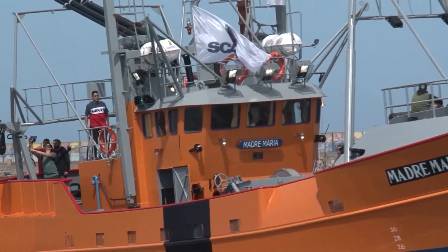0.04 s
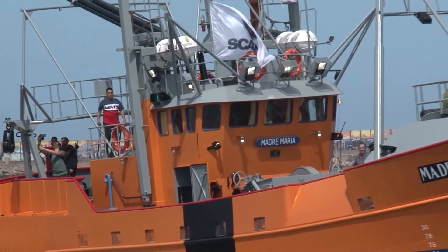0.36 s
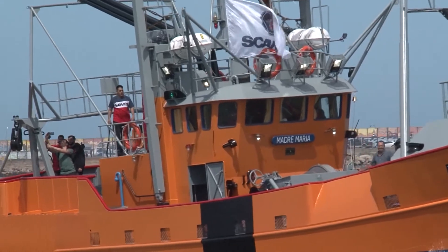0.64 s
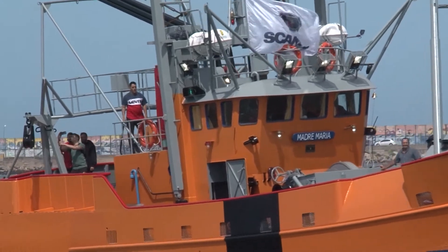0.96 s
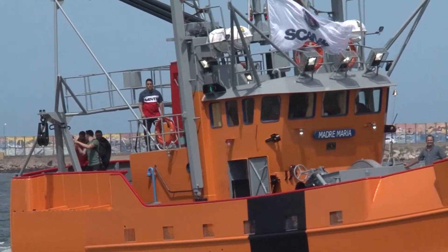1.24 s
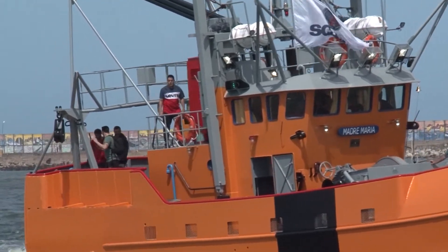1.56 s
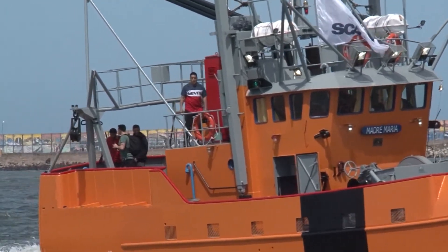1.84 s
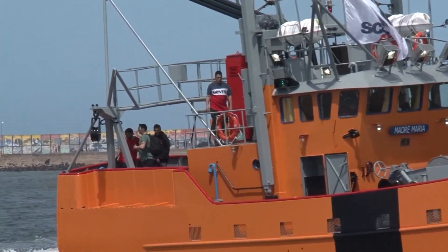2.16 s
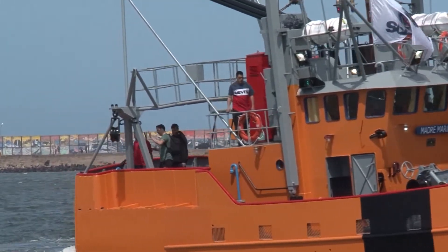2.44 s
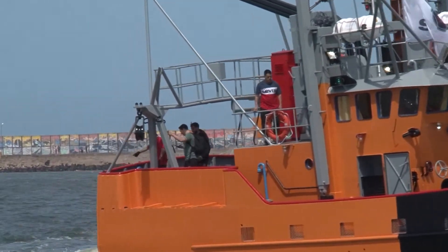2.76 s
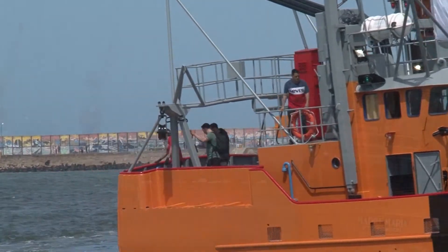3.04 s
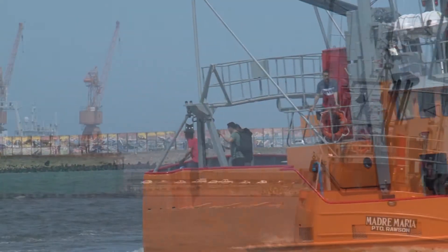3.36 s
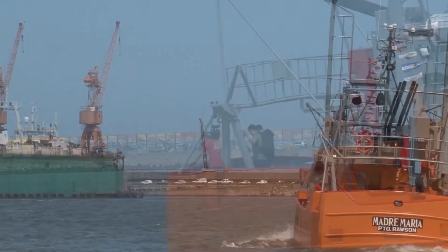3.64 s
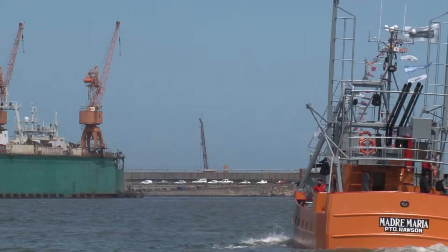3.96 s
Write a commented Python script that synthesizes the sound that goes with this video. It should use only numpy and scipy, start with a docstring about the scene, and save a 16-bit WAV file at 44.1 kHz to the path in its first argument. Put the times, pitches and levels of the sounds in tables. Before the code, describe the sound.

A fishing boat's air horn holds one long, brassy note, then stops and echoes around the harbour. Wind rumbles and thumps on the microphone throughout, and a faint wash of wake comes in near the end.

```python
"""In a windy harbour, a fishing boat passes and holds one long blast on its air horn.
The horn is a stack of harmonics (whole multiples of one pitch); each flutters, higher ones faster.
It stops, and its echoes linger off the quays while wind rumbles and thumps on the microphone.
Near the end, the distant hiss of water gives way abruptly to the wash of the boat's wake,
with a faint engine whine."""
import sys
import numpy as np
from scipy import signal
from scipy.fft import rfft, irfft, next_fast_len
from scipy.io import wavfile
from scipy.ndimage import uniform_filter1d

SR = 44100
rng = np.random.default_rng(int(sys.argv[2]) if len(sys.argv) > 2 else 0)


def unload_wav(signal):
    """Save mono or channel-first audio to the path in sys.argv[1] as 16-bit WAV at rate SR, clipped to [-1, 1]."""
    wavfile.write(
        sys.argv[1],
        SR,
        np.round(np.clip(np.atleast_2d(signal).T, -1, 1) * 32767).astype(np.int16),
    )


N = 176400  # 4 seconds

# the horn's pitch, sinking as the boat passes: (time [s], pitch [Hz])
HORN_PITCH = [(0, 273.6), (.7, 273.75), (1.5, 273.45), (2.1, 273.25), (2.6, 273.05)]
# how loud the horn is, before each harmonic is shaped: (time [s], level [dB])
HORN_LEVEL = [(0, -31), (.2, -26.5), (.4, -28), (.9, -26), (1.3, -25), (1.5, -23.5), (1.75, -24.5),
              (1.88, -25.5), (2.05, -26), (2.35, -26.5), (2.6, -26)]
# how the flare, the horn's wide mouth, shapes the harmonics: (frequency [Hz], gain [dB])
FLARE_COLOUR = [(273, 0.5), (547, -4), (820, -17.5), (1093, -13.5), (1366, -14.5), (1640, -19.5),
                (1913, -18.5), (2186, -29), (2460, -33), (2733, -31), (3006, -32.5), (3280, -37),
                (3826, -43.5), (4373, -40), (4920, -47.5), (6800, -57.5), (9000, -70), (11500, -84)]
# how fast the flare rings down after the blast: (frequency [Hz], fade [dB/s])
FLARE_FADE = [(273, 210.5), (547, 125.5), (820, 419), (1100, 441), (1400, 271), (4000, 233)]
# how deeply each harmonic flutters: (frequency [Hz], relative level [dB])
FLUTTER_DEPTH = [(273, -27), (547, -23), (820, -5), (1093, -12), (1366, -14), (1640, -11), (1913, -10.5),
                 (2400, -7), (4400, -7), (8000, -5)]
# boost or dip of the middle harmonics: (time [s], gain [dB])
MIDDLE_BOOST = [(0, 7), (.15, 5.5), (.35, 10), (.55, 7), (.72, -3), (0.932, 2.5), (1.25, -2), (1.55, -3.5),
                (1.8, 2), (1.92, 6), (2.119, 6), (2.331, 4), (2.5, 14.5), (2.6, 7)]
# the centre of that middle band, sinking as the boat passes: (time [s], frequency [Hz])
MIDDLE_CENTRE = [(0, 1035), (1.9, 1042), (2.4, 943)]
# boost or dip of the fifth harmonic: (time [s], gain [dB])
FIFTH_BOOST = [(0, 3), (.12, -11.5), (.3, 6), (.45, 3), (.55, -7.5), (.8, -8.5), (0.949, 1), (1.15, -3),
               (1.33, -2.5), (1.449, 1), (1.8, 5), (2.349, 2.5), (2.6, 4)]
# boost or dip of the harmonics around UPPER_HZ: (time [s], gain [dB])
UPPER_BOOST = [(0, -1), (0.651, -2.5), (0.999, 2), (1.199, 8.5), (1.499, 6.5), (1.62, 2), (1.728, 10),
               (1.931, -8.5), (2.03, 3.5), (2.2, 7.5), (2.34, -6.5), (2.6, 2)]
# boost or dip of all harmonics above TREBLE_HZ: (time [s], gain [dB])
TREBLE_BOOST = [(0, 2), (.3, 0), (.7, 1), (1.001, -6.5), (1.1, 0.5), (1.301, 1), (1.42, -2), (1.52, 3.5),
                (1.66, -0.5), (1.77, 7.5), (1.92, 0.5), (2.1, 4), (2.329, 3), (2.44, 5.5), (2.6, 2)]
# boost or dip of the brassy edge around EDGE_HZ, on top of the treble: (time [s], gain [dB])
EDGE_BOOST = [(0, -4.5), (.95, -1), (1.151, 4), (1.3, -6), (1.53, 6.5), (1.65, -2), (1.86, 4.5),
              (1.96, -1.5), (2.08, 4), (2.299, -4), (2.44, 8.5), (2.6, 0)]
# how the quays colour the echoes: (frequency [Hz], gain [dB])
ECHO_COLOUR = [(273, -12), (550, -6), (820, 1), (1100, -2), (1400, -5.5), (1900, -6.5), (2300, 0),
               (3000, -2), (3550, 1.5), (4100, -6.5), (4650, -0.5), (8000, -6)]
# swells in the echo as the far quay answers: (time [s], gain [dB])
ECHO_SWELLS = [(2.6, -1), (2.66, 0), (2.735, -7), (2.81, 1.5), (2.88, -3), (2.98, 1.5), (3.07, -5),
               (3.15, 1), (3.22, -3), (3.3, 2), (3.42, -3)]
# strength of the wind: (time [s], level [dB])
GUST_LEVEL = [(0, -19), (.08, -12.5), (.14, -18.5), (.38, -24.5), (.6, -19.5), (.8, -23.5), (1.1, -23.5),
              (1.35, -20.5), (1.85, -18), (2.2, -17.5), (2.45, -18), (2.7, -17.5), (3.2, -15.5),
              (3.56, -19), (3.61, -23), (3.8, -23), (4, -18.5)]
# tone colour of the wind's rumble: (frequency [Hz], relative level [dB])
RUMBLE_COLOUR = [(12, -29), (25, -15.5), (45, -2), (65, 0.5), (85, -2), (120, -9), (200, -20), (300, -33),
                 (500, -44), (1000, -68), (3000, -93.5)]
# tone colour of the puffs on top of it: (frequency [Hz], relative level [dB])
PUFF_COLOUR = [(40, -22.5), (90, 1), (140, 3.5), (220, -1.5), (330, -11), (500, -38.5), (1000, -45),
               (2500, -60.5), (8000, -89.5)]
# single thumps of wind on the microphone: (time [s], peak level [dB])
THUMPS = [(0.056, -8.5), (0.093, -16.5), (0.908, -12), (0.954, -14.5), (1.418, -9.5), (1.823, -9.5),
          (1.951, -10), (2.045, -14), (2.229, -14.5), (2.662, -6.5), (2.819, -8), (2.94, -6),
          (3.023, -13.5), (3.158, -2), (3.306, -8), (3.358, -7), (3.446, -10), (3.465, -9), (3.514, -4.5),
          (3.559, -6)]
# tone colour of distant water and machinery: (frequency [Hz], relative level [dB])
FAR_WATER_COLOUR = [(100, -3.5), (400, 4.5), (800, -8), (1700, -16.5), (3000, -26), (5000, -38),
                    (8000, -52.5), (12000, -59)]
# tone colour of the nearby wake: (frequency [Hz], relative level [dB])
WAKE_COLOUR = [(150, -3.5), (400, 4), (620, 3), (1100, -6.5), (2000, -10), (3000, -16), (4500, -22),
               (6000, -32), (8000, -36), (11000, -51.5)]
# the tones in the engine's whine: (frequency [Hz], level [dB])
WHINE_TONES = [(667.5, -70), (1217, -68.5), (1427, -69), (1771, -65)]

STOP_S, WAKE_START_S = 2.615, 3.583
LOW_CUT_HZ, HIGH_CUT_HZ = 21, 11700
UPPER_HZ, TREBLE_HZ, EDGE_HZ = 1850, 2100, 4330
BASE_HZ = HORN_PITCH[0][1]
HARMONICS = range(1, int(HIGH_CUT_HZ / BASE_HZ))
ECHO_FADE_S = 2.62  # time to fade by 60 dB


def horn(t, pitch):
    """The air horn sounds a stack of harmonics, which sag in pitch and ring down as it stops."""
    since_stop = np.maximum(t - STOP_S, 0)
    sag_hz = 2.3 * np.tanh(since_stop / .025)
    phase = 2 * np.pi * np.cumsum(pitch - sag_hz) / SR
    level, middle_hz = at_time(HORN_LEVEL, t), at_time(MIDDLE_CENTRE, t)
    middle, fifth, upper, edge = (
        at_time(rows, t) for rows in (MIDDLE_BOOST, FIFTH_BOOST, UPPER_BOOST, EDGE_BOOST))
    treble = at_time(TREBLE_BOOST, t) + 2.5 * drift(5.4)  # the treble flickers
    out = 0
    for k in HARMONICS:
        hz = k * BASE_HZ
        boost_db = (middle * band(hz, middle_hz, octaves=.29)
                    - .16 * middle * (k == 2)  # the second harmonic dips as the middle swells
                    + fifth * (k == 5)
                    + upper * band(hz, UPPER_HZ, octaves=.19)
                    + edge * band(hz, EDGE_HZ, octaves=.072))
        along, across = harmonic_flutter(hz), harmonic_flutter(hz)
        if hz > TREBLE_HZ:
            boost_db += treble + 2.5 * flutter(2)  # each also swells and fades on its own
        gain = np.sqrt(2) * from_db(level + at_hz(FLARE_COLOUR, hz) - at_hz(FLARE_FADE, hz) * since_stop)
        out = out + gain * tone(k * phase + 2 * np.pi * rng.random(), from_db(boost_db) + along, across)
    return out


def harmonic_flutter(hz):
    """Each harmonic flutters, higher ones faster, with a quick shimmer on top."""
    rise = (hz / 1000) ** .6
    slow = flutter(7.2 * rise)
    shimmer = .14 * rise * drift(72)
    return from_db(at_hz(FLUTTER_DEPTH, hz)) * (slow + shimmer)


def quay_echoes(t, pitch):
    """The quays send the horn back as wavering echoes that fade and grow duller once it stops."""
    since_stop = np.maximum(t - STOP_S, 0)
    phase = 2 * np.pi * np.cumsum(pitch + 1.3) / SR  # 1.3 Hz above the horn
    level = at_time(HORN_LEVEL, t) + at_time(ECHO_SWELLS, t) - 60 * since_stop / ECHO_FADE_S
    out = 0
    for k in HARMONICS:
        hz = k * BASE_HZ
        dulling_db = 1.5 * (hz / 1000) * since_stop
        gain = from_db(level + at_hz(FLARE_COLOUR, hz) + at_hz(ECHO_COLOUR, hz) - dulling_db)
        out = out + gain * tone(k * phase, np.tanh(flutter(5)), np.tanh(flutter(5)))
    return out * np.interp(t, [STOP_S - .1, STOP_S], [from_db(-6), 1])  # weaker during the blast


def wind(t):
    """Wind on the microphone makes a low rumble and quick puffs; both follow the gusts."""
    gust_db = at_time(GUST_LEVEL, t)
    rumble = noise(RUMBLE_COLOUR)
    rumble = rumble / np.sqrt(uniform_filter1d(rumble ** 2, size=SR // 6))  # even out chance swells
    puffs = unit_power(noise(PUFF_COLOUR) * from_db(9 * np.tanh(drift(10))))
    puff_db = -33.5 + .87 * (gust_db - gust_db.mean())
    return from_db(gust_db) * rumble + from_db(puff_db) * puffs


def wind_thumps(t, typical_hz=74, rise_s=.0021, decay_s=.007):
    """Each swirl of air that hits the microphone gives a low thump that dies at once."""
    out = 0
    for time_s, peak_db in THUMPS:
        age = np.maximum(t - time_s + rise_s, 0)
        hz = typical_hz * rng.uniform(.83, 1.37)
        envelope = np.tanh(age / rise_s) ** 2 * np.exp(-age / decay_s)
        thump = np.sin(2 * np.pi * hz * age) * envelope
        out = out + from_db(peak_db) * thump / np.abs(thump).max()
    return out


def water(t, far_db=-51.5, wake_db=-46.5, fade_db_per_s=4.5):
    """Distant water hisses, until the close wash of the wake and the engine's whine take over."""
    fade_db = fade_db_per_s * np.maximum(t - WAKE_START_S, 0)
    wake = from_db(wake_db - fade_db + .53 * drift(25)) * noise(WAKE_COLOUR)
    whine = engine_whine(t)
    far_water = from_db(far_db) * noise(FAR_WATER_COLOUR)
    return np.where(t < WAKE_START_S, far_water, wake + whine)


def engine_whine(t):
    """The engine gives a few faint, slightly unsteady tones."""
    return sum(np.sqrt(2) * from_db(db) * np.cos(2 * np.pi * hz * t + .5 * drift(8.5))
               for hz, db in WHINE_TONES)


def from_db(db):
    """Turn decibels into a number to multiply by."""
    return 10 ** (np.asarray(db) / 20)


def unit_power(x):
    """Scale a signal so its average power is one."""
    return x / np.sqrt(np.mean(x ** 2) + 1e-20)


def at_time(rows, t):
    """Read a table at the given times."""
    return np.interp(t, *np.transpose(rows))


def at_hz(rows, hz):
    """Read a table at the given frequencies, with octaves evenly spaced."""
    frequencies, values = np.transpose(rows)
    return np.interp(np.log(np.maximum(hz, 1)), np.log(frequencies), values)


def band(hz, centre_hz, octaves):
    """A weight that is one near the centre frequency and falls to zero further away."""
    distance = np.log2(hz / centre_hz) / octaves
    return np.exp(-distance ** 4 / 2)


def tone(phase, along, across):
    """A tone made of two waves a quarter of a cycle apart, each with its own strength."""
    return along * np.cos(phase) + across * np.sin(phase)


def noise(colour):
    """Noise with the given tone colour and a power of one."""
    size = next_fast_len(N)
    gains = from_db(at_hz(colour, np.fft.rfftfreq(size, 1 / SR)))
    white = rfft(rng.standard_normal(N), size)
    return unit_power(irfft(white * gains, size)[:N])


def drift(rate_hz, step=40, warm_up=2000):
    """Smooth random wandering, mostly slower than the given rate, with a typical size of one."""
    memory = np.exp(-2 * np.pi * rate_hz * step / SR)
    white = rng.standard_normal(N // step + warm_up + 2)
    slow = signal.lfilter([1], [1, -2 * memory, memory ** 2], white)[warm_up:]
    return np.interp(np.arange(N) / step, np.arange(len(slow)), unit_power(slow))


def flutter(rate_hz, step=40):
    """Smooth, uneven swinging at about the given rate, with a typical size of one."""
    size = N // step
    hz = np.maximum(np.fft.rfftfreq(size, step / SR), 1e-3)
    slow = irfft(rfft(rng.standard_normal(size)) * band(hz, rate_hz, octaves=.9), size)
    return np.interp(np.arange(N) / step, np.arange(size), unit_power(slow))


def scene():
    """Everything sits a touch to the right; a faint extra wind rumble adds width."""
    t = np.arange(N) / SR
    pitch = at_time(HORN_PITCH, t) + .05 * drift(5) + .15 * drift(100)  # slow waver, quick jitter
    mix = horn(t, pitch) + quay_echoes(t, pitch) + wind(t) + wind_thumps(t) + water(t)
    width = from_db(at_time(GUST_LEVEL, t) - 33) * noise(RUMBLE_COLOUR)
    return np.array([mix * from_db(-.28) + width, mix * from_db(.28) - width])


def record(dry):
    """Soften the deepest bass and cut the highest treble steeply."""
    trimmed = signal.sosfilt(signal.butter(2, LOW_CUT_HZ, "high", fs=SR, output="sos"), dry)
    return signal.sosfilt(signal.cheby2(12, 70, HIGH_CUT_HZ, fs=SR, output="sos"), trimmed)


dry = scene()
out = record(dry)
unload_wav(out)
```